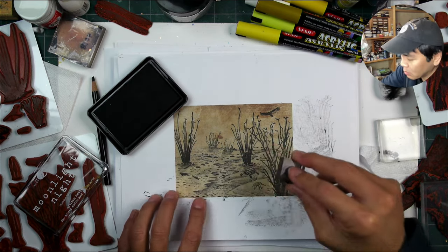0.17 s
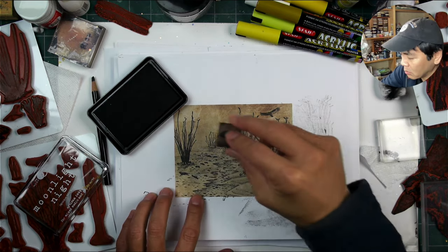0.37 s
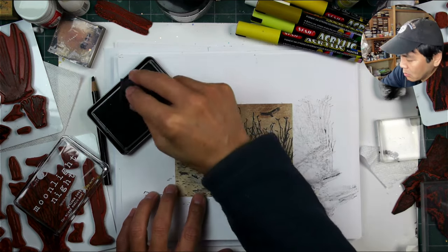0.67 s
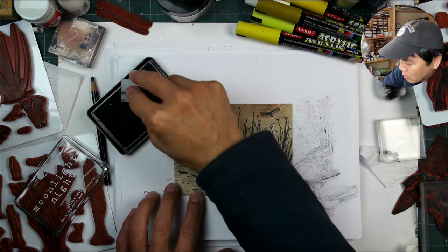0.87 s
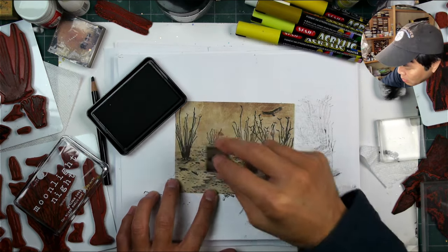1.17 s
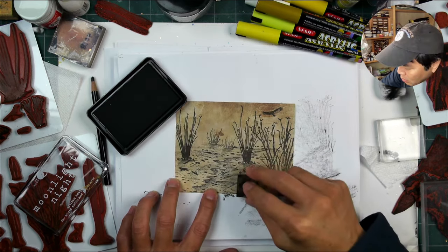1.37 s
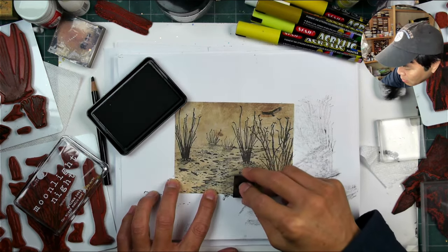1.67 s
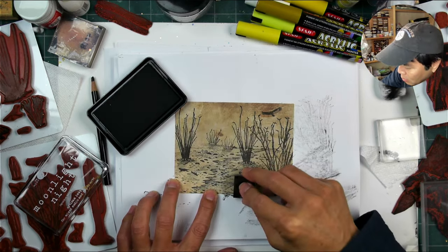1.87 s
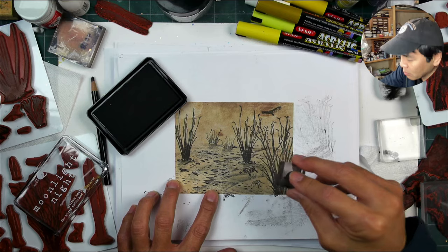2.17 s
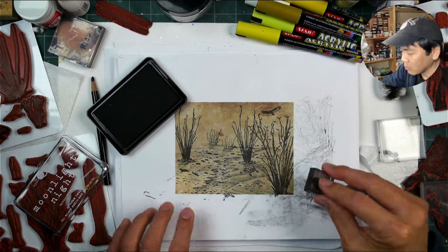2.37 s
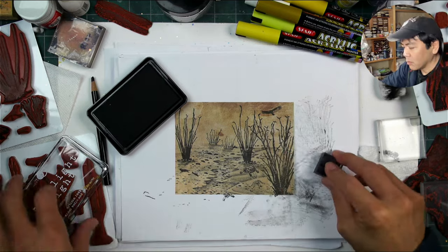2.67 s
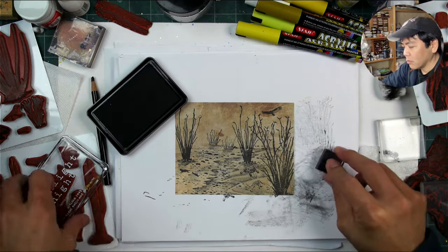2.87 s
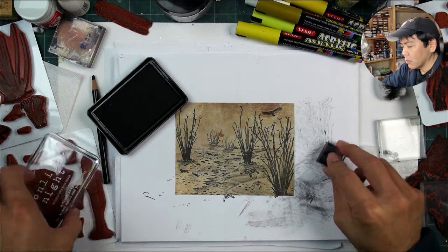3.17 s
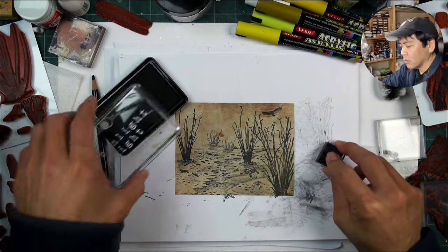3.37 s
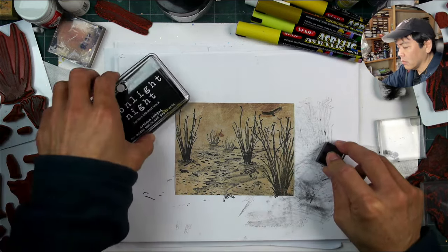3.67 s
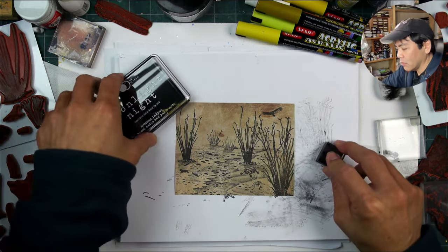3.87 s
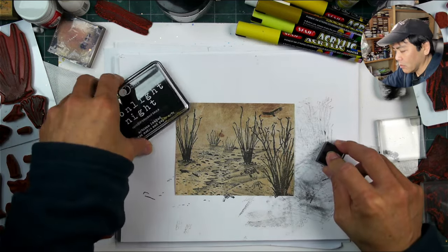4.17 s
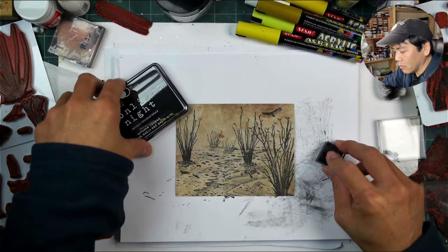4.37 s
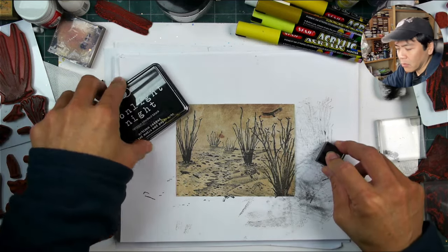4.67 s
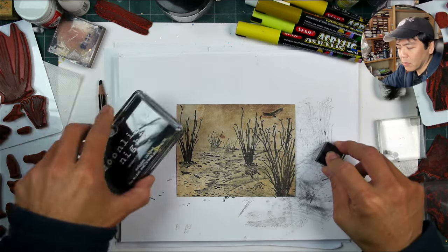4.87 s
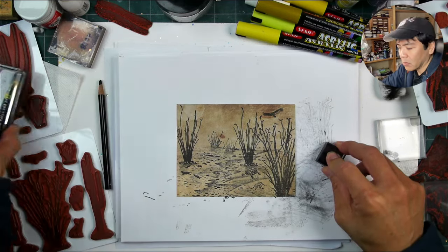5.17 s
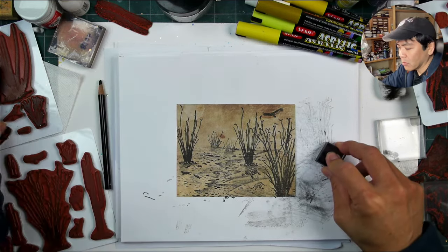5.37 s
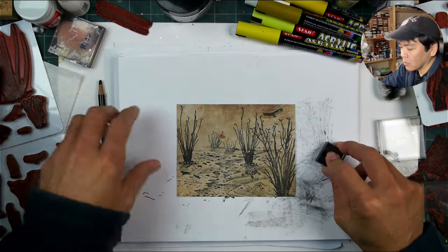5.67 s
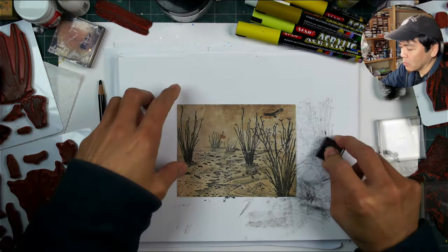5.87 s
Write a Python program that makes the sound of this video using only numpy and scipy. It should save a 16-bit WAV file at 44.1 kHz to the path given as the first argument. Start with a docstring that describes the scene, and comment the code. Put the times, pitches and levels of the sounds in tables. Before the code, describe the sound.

A small rubber stamp taps twice on an ink pad, rattling its plastic case against the desk. A hollow plastic lid clacks as it is picked up, and the stamp thumps twice on paper. The lid is clapped onto the case, rocks with a quick rattle, then is set aside. Two more stamp thumps follow. The room is small and quiet, with a faint fan hum.

```python
"""A small rubber stamp is inked with two taps on a pad, rattling its plastic case against the desk.
The other hand picks up the clear lid, and the stamp is dabbed twice on paper, thumping the desk.
The lid is clapped on the case, where it rocks from edge to edge, and is then laid aside again.
Last, the sticky rubber peels off the paper with a tiny crackle and comes down twice more.
In between, hands brush the paper; a small room with a faint fan hum echoes each knock."""
import sys
import numpy as np
from scipy import signal
from scipy.fft import rfft, irfft, next_fast_len
from scipy.io import wavfile
from scipy.ndimage import map_coordinates

SR = 44100
rng = np.random.default_rng(int(sys.argv[2]) if len(sys.argv) > 2 else 0)


def store_wav(level_fs):
    """Save 16-bit WAV to argv[1]."""
    pcm = np.round(np.clip(np.atleast_2d(level_fs), -1, 1) * 32767)
    wavfile.write(sys.argv[1], SR, pcm.T.astype(np.int16))


N = 265570
T = np.arange(2 ** 15) / SR  # seconds since a touch


# Levels compare the rows of a table. A fade is the time a sound takes to drop by 60 dB.
# Brightness turns the treble above about 2 kHz up (+) or down (-).
# Taps on the pad: (time [s], level [dB], case ring [dB], brightness [dB/octave], rattle time [s])
PAD_TAPS = [(.651, 5.5, 1, -0.5, 0.013), (.798, 3, -3.5, -2.5, 0.015)]
# The notes the plastic case rings with: (pitch [Hz], level [dB], fade [s])
CASE_NOTES = [(1082, -5, .13), (1128, -2, .1), (1384, 0, .15), (1404, -1, .15), (1437, -1, .13),
              (1530, -3, .12), (1718, -6, .12), (1909, -4, .16), (3548, -10, .13), (3864, -5, .19),
              (3895, -10, .12), (4259, -8, .11), (4605, -9, .18), (5394, -6, .14), (5918, -10, .13),
              (5942, -11, .15), (7060, -9, .16), (7967, -14, .15), (8549, -12, .15)]
# The tone of the rattling case: (frequency [Hz], level [dB])
CLATTER_TONE = [(60, -25), (220, 0), (800, 2.5), (1600, 5.5), (2200, 0), (3800, 2.5), (6000, -5),
                (8400, -9.5), (9500, -14), (15500, -21.5)]
def ink_pad():
    """The stamp squishes the wet pad; the case rattles on the desk, and its ring builds up meanwhile."""
    out = np.zeros(N)
    lead_s = .006  # the rubber meets the pad this long before the case meets the desk
    for s, db, ring_db, tilt_db, rattle_s in PAD_TAPS:
        force = rng.standard_normal(len(T)) / (1 + (T / rattle_s) ** 3)
        clatter = amp(db) * coloured(force / np.linalg.norm(force), CLATTER_TONE, tilt_db)
        case = amp(ring_db - 31) * ring(CASE_NOTES) * (1 - np.exp(-T / .003))
        squish = amp(db - 21) * coloured(contact(.06, first_db=-18.5), RUBBER_TONE, tilt_db=-3)
        add(out, s, clatter + coloured(case, [(1000, 0.016)], tilt_db), echo_db=-8.5)
        add(out, s - lead_s, squish + desk(thump_db=db - 10.5, knock_db=db - 10.5))
        add(out, s, desk(thump_db=db - 5, knock_db=db - 4))
    return out


# Dabs on the paper: (time [s], desk knock [dB], desk thump [dB], paper tick [dB])
PAPER_DABS = [(0.4344, -17.5, -11.5, -21.5), (1.618, -28.5, -43, -24), (1.6385, -18.5, -38, -20.5),
              (2.7552, -15.5, -13, -25), (2.935, 0.5, -4.5, -18.5), (3.113, 0, -2, -18.5),
              (3.771, -13.5, -36, -30), (4.400, -19, -13, -44), (5.7923, 2.5, 2.5, -19),
              (5.9717, 0, 5, -11)]
# The tone of rubber landing on paper or on the pad: (frequency [Hz], level [dB])
RUBBER_TONE = [(40, -26), (250, -4), (620, 12), (1300, 5), (1800, -4.5), (2500, -4.5), (4500, -5),
               (8000, -13), (10000, -19), (15500, -24.5)]
def dabs():
    """Rubber lands softly: the desk thumps and knocks, and the paper ticks, brighter if hit harder."""
    out = np.zeros(N)
    for s, knock_db, thump_db, tick_db in PAPER_DABS:
        tick = coloured(contact(0.018, first_db=-16.5), RUBBER_TONE, tilt_db=0.67 * knock_db - 1)
        add(out, s, desk(thump_db, knock_db))
        add(out, s, amp(tick_db) * tick, echo_db=-2)
    return out


# The lid touches something: (time [s], clack [dB], middle pitch [Hz], click [dB],
# click brightness [dB/octave], click fade [s], desk thump [dB], desk knock [dB], rocking time [s])
LID_TOUCHES = [(2.570, -20, 910, -25.5, 2.5, 0.0068, -13.5, -12, 0),
               (2.644, 5, 1430, -17, 0.5, 0.02, -15, -13.5, 0.00061),
               (3.635, -1, 830, -12, -0.5, 0.03, -40, -31, 0.00043),
               (3.681, 12, 820, -6, 0.5, 0.027, -40, -16, 0.0074),
               (3.860, -17, 875, -38, -3.5, .024, -45, -32, 0.00063),
               (4.046, -14, 800, -33.5, 3, 0.075, -23, -23, 0.0015),
               (4.1628, 16, 908, -10, 0.5, 0.035, -30, 3, .027),
               (5.013, -1.5, 810, -31, -2, 0.017, -11.5, -11, 0.00049),
               (5.244, 8, 740.7, -23, -7.5, 0.019, -17, -6, 0.0015),
               (5.298, 5, 837, -11.5, -8, .1, -11, -9, 0),
               (5.3612, -9.5, 972, -24.5, -6, .005, -35, -33, 0)]
# The pitches the hollow lid favours: (pitch [Hz], width [Hz], level [dB])
LID_HOLLOW = [(540, 40, -10), (608, 88, -4), (705, 146, -5.5), (885, 18, -1), (939, 150, -17),
              (1076, 50, 1), (1460, 90, 0)]
# The notes of its stiff rim: (pitch [Hz], level [dB], fade [s])
RIM_NOTES = [(5750, -5, .09), (6490, 1, .15), (6800, -3, .11), (7520, -2, .1), (8200, -3, .08),
             (11900, -6, .09)]
# The tone of its hard edge: (frequency [Hz], level [dB])
EDGE_TONE = [(100, -15.5), (600, 2.5), (1200, 1), (2000, 3.5), (2500, -2), (3200, -1), (5500, 0.5),
             (8300, -5), (9500, -13), (12500, -11.5), (15500, -26)]
def lid():
    """The hollow lid clacks, pitched by where it is held and hit, and its edge clicks on each bounce."""
    out = np.zeros(N)
    gap_s, loss_db = .0048, 0.47  # from one bounce to the next while it rocks
    body = lambda f: 0.2 + sum(amp(db) * resonance(f, hz, width) for hz, width, db in LID_HOLLOW)
    for s, clack_db, pitch_hz, click_db, tilt_db, fade_s, thump_db, knock_db, rocking_s in LID_TOUCHES:
        bounces = int(rocking_s / gap_s)
        add(out, s + min(bounces, 1) * gap_s, desk(thump_db, knock_db))  # the first full hit
        for k in range(1 + bounces):
            graze_db = 0 if k else -400 * rocking_s  # long rocking starts with a lighter, duller touch
            force_db = graze_db - k * loss_db
            octaves = .25 * (-1) ** k if bounces > 1 else 0  # one edge sounds higher, the other lower
            hz = pitch_hz * 2 ** octaves
            hollow = lambda f: body(f) * resonance(f, hz, .9 * hz) ** 4
            clack = filtered(contact(0.1 * fade_s, first_db=-1), hollow)
            rim = amp(-38.5) * ring(RIM_NOTES) / (1 + (fade_s / 0.017) ** 2)  # long chatter hushes it
            edge = contact(fade_s, first_db=-11.5) + rim
            click = coloured(edge, EDGE_TONE, tilt_db + 0.33 * graze_db)
            add(out, s + k * gap_s, amp(clack_db + force_db) * clack, echo_db=-9)
            add(out, s + k * gap_s, amp(click_db + force_db) * click, echo_db=-4.5)
    return out


# The low notes of the whole desk bending: (pitch [Hz], level [dB], fade [s])
THUMP_NOTES = [(35.05, -14, 0.91), (53, -12, 0.22), (68.2, -1, .15), (106, 1, .17), (135, -5.5, 0.072)]
# The higher notes of its stiff top: (pitch [Hz], level [dB], fade [s])
KNOCK_NOTES = [(184, -6, 0.057), (233.1, -4, 0.081), (340.2, -11.5, 0.1), (435.7, 1, 0.084),
               (492, 11, 0.011), (598.8, -4.5, 0.095), (770, -26, 0.022), (1040, -20.5, 0.033),
               (1289, -14, 0.042)]
def desk(thump_db, knock_db):
    """A blow on the desk: the whole board thumps and its top knocks, both echoing in the room."""
    out = np.zeros(len(T))
    add(out, 0, amp(thump_db - 36.5) * ring(THUMP_NOTES), echo_db=-13)
    add(out, 0, amp(knock_db - 39) * ring(KNOCK_NOTES), echo_db=-3.5)
    return out


# The rubber peels off the paper: (time [s], level [dB], swell time [s])
STAMP_LIFTS = [(2.828, -27, 0.007), (5.703, -25, 0.0024)]
# The tone of sticky ink letting go: (frequency [Hz], level [dB])
STICKY_TONE = [(40, -4), (300, 4.5), (1000, 1.5), (4500, 1), (8000, -5), (10000, -8.5), (15500, -13)]
def peels():
    """Threads of ink snap in a short swell of tiny crackles."""
    out = np.zeros(N)
    lead_s = .03  # space for the swell before its peak
    for s, db, swell_s in STAMP_LIFTS:
        snaps = rng.laplace(size=len(T)) * np.exp(-((T - lead_s) / swell_s) ** 2 / 2)
        crackle = coloured(snaps / np.linalg.norm(snaps), STICKY_TONE)
        add(out, s - lead_s, amp(db) * crackle, echo_db=-2)
    return out


# Strokes over the paper: (middle time [s], level [dB], half length [s], brightness [dB/octave])
HAND_STROKES = [(0.525, -67.5, 0.029, -6), (1.865, -67.5, 0.0082, -6), (2.375, -67.5, 0.16, -4),
                (2.588, -63.5, 0.076, 2), (2.8, -67.5, 0.095, 2), (4.053, -71, 0.2, 2),
                (4.416, -59, 0.021, -1), (4.537, -73, 0.075, 2), (4.648, -58.5, 0.018, -10),
                (5.065, -60, 0.044, -4.5), (5.328, -63.5, 0.12, -2.5), (5.6, -66.5, 0.14, -1.5)]
def brushing():
    """Skin and sleeve brush the paper; each stroke swells and fades, catching unevenly."""
    catches_per_s, catch_db = 22.8, 2.64
    t = np.arange(N) / SR
    catches = rng.standard_normal(int(t[-1] * catches_per_s) + 4)
    grip = map_coordinates(catches, [t * catches_per_s])  # glide smoothly between them
    strokes = np.zeros(N)
    for s, db, half_s, tilt_db in HAND_STROKES:
        swell = np.exp(-((t - s) / half_s) ** 2 / 2)
        strokes += amp(db) * swell * rub(tilt_db)
    return amp(catch_db * grip) * strokes


# The tone of a sliding hand: (frequency [Hz], level [dB])
RUB_TONE = [(60, 3.5), (300, 1.5), (740, 1), (1050, -7.5), (1600, -7), (2200, -11.5), (4000, -18.5),
            (8000, -29.5), (15000, -37)]
# The pitches the paper sheets favour: (pitch [Hz], width [Hz], level [dB])
SHEET_PEAKS = [(710, 320, 1), (1950, 500, -1)]
def rub(tilt_db):
    """Rubbing makes a steady hiss, which the sheets of paper colour."""
    sheets = lambda f: 1 + sum(amp(db) * resonance(f, hz, width) for hz, width, db in SHEET_PEAKS)
    hiss = coloured(rng.standard_normal(N), RUB_TONE, tilt_db)
    return unit(filtered(hiss, sheets))


# How long the room's echo lasts: (frequency [Hz], fade [s])
ECHO_FADES = [(60, 0.58), (250, 0.15), (1000, 0.23), (4000, 0.27), (8000, 0.23), (15000, 0.17)]
def room_echo():
    """The walls throw the sound back, and each frequency dies away at its own speed."""
    hz, t, noise = signal.stft(rng.standard_normal(SR // 2), SR, nperseg=256)
    fade = amp(-60 * t / along(ECHO_FADES, hz)[:, None])
    tail = signal.istft(noise * fade, SR, nperseg=256)[1]
    tail *= 1 - np.exp(-(np.arange(len(tail)) / SR / 0.0025) ** 2)  # the walls answer a moment later
    return tail / np.linalg.norm(tail)


# The tone of the air in the room: (frequency [Hz], level [dB])
AIR_TONE = [(20, -4.5), (40, 3), (60, -2), (95, 10.5), (160, -10), (300, -8.5), (560, -4.5), (850, -13),
            (1300, -15), (2200, -20.5), (2900, -19), (3500, -24), (8400, -28), (9400, -34.5), (15500, -30)]
def room_tone():
    """Steady air noise and the low hum of a fan."""
    air = unit(filtered(rng.standard_normal(N), lambda f: amp(along(AIR_TONE, f))))
    hum = unit(filtered(rng.standard_normal(N), lambda f: resonance(f, hz=91.74, width=7.3) ** 2))
    return amp(-68) * air + amp(-73) * hum


def contact(fade_s, first_db):
    """The push of two things meeting: a first touch, then chatter that builds up and dies."""
    age = T / max(fade_s, .001)
    force = rng.standard_normal(len(T)) * amp(-60 * age) * (1 - np.exp(-age / 0.037))
    force /= np.linalg.norm(force)
    force[0] += amp(first_db)
    return force / np.linalg.norm(force)


def ring(notes):
    """A struck object rings with fading notes, at slightly new strengths for every blow."""
    scatter_db = rng.normal(0, 1.2, len(notes))
    return sum((-1) ** k * amp(db + scatter_db[k] - 60 * T / fade_s) * np.sin(2 * np.pi * hz * T)
               for k, (hz, db, fade_s) in enumerate(notes))


def resonance(f, hz, width):
    """How strongly something that rings at hz answers frequency f; 1 at the peak."""
    return 1j * f * width / (hz * hz - f * f + 1j * f * width)


def coloured(x, tone, tilt_db=0, size=2048):
    """Give a sound the tone in a table; tilt_db is the brightness."""
    hz = np.fft.rfftfreq(size, 1 / SR)
    gain = amp(along(tone, hz) + tilt_db * np.log2(1 + hz / 2000))
    # fold the filter forward in time, so that nothing sounds before the hit
    folded = irfft(np.log(gain))
    folded[1:size // 2] *= 2
    folded[size // 2 + 1:] = 0
    return signal.fftconvolve(x, irfft(np.exp(rfft(folded))))[:len(x)]


def filtered(x, response):
    """Multiply each frequency in a sound by response(frequency)."""
    size = next_fast_len(len(x) + 8192)
    return irfft(rfft(x, size) * response(np.fft.rfftfreq(size, 1 / SR)), size)[:len(x)]


def add(track, s, sound, echo_db=None):
    """Place a sound at s seconds, with room echo if echo_db is given."""
    if echo_db is not None:
        sound = sound + amp(echo_db) * signal.fftconvolve(sound, room_echo())[:len(sound)]
    stretch = track[round(s * SR):][:len(sound)]
    stretch += sound[:len(stretch)]


def along(points, hz):
    """Read between the rows of a (frequency, value) table, spacing octaves evenly."""
    f, values = np.transpose(points)
    return np.interp(np.log(hz + 1), np.log(f + 1), values)


def amp(db):
    """Turn decibels into a volume multiplier."""
    return 10 ** (np.asarray(db) / 20)


def unit(x):
    """Scale a sound to an average strength (rms) of 1."""
    return x / np.sqrt(np.mean(x ** 2) + 1e-20)


def scene():
    """Everything on the desk and the room behind it, in one channel."""
    return (ink_pad() + dabs() + lid() + peels() + brushing() + room_tone())[None]


def record(dry):
    """The very highest treble is cut off steeply."""
    top_hz = 15850
    return np.array([filtered(x, lambda f: 1 / np.sqrt(1 + (f / top_hz) ** 200)) for x in dry])


dry = scene()
out = record(dry)
store_wav(out)
```